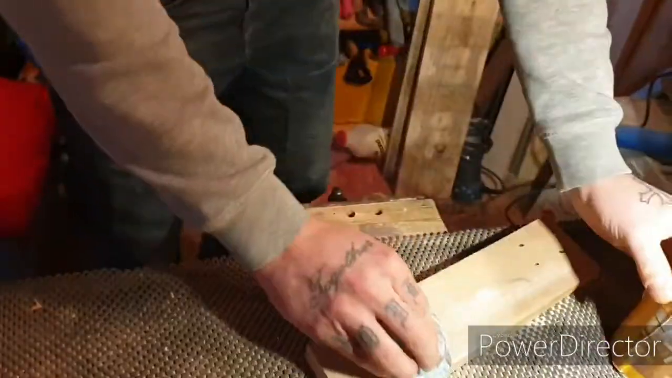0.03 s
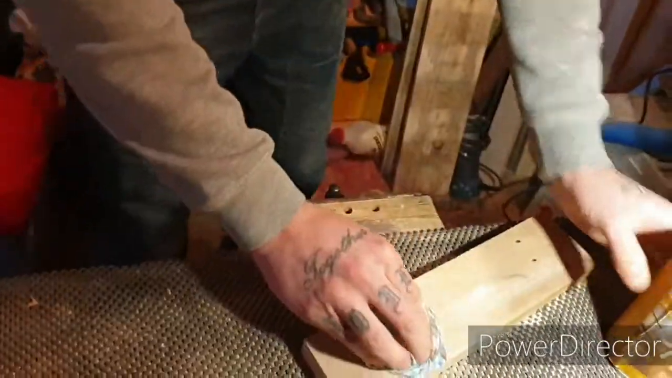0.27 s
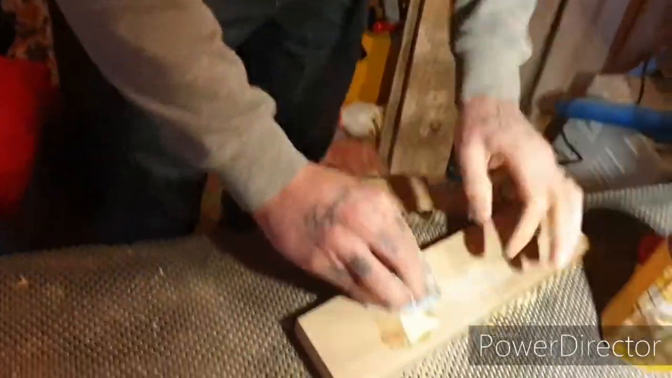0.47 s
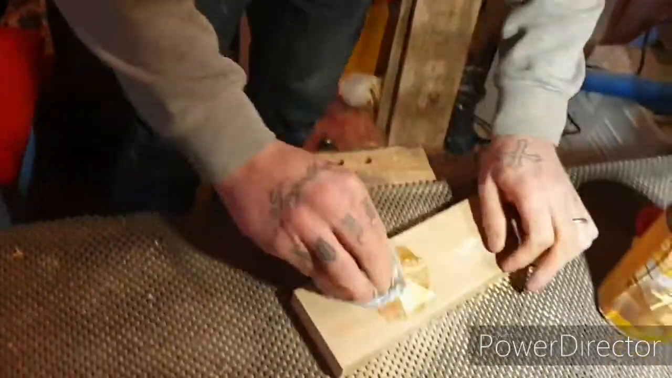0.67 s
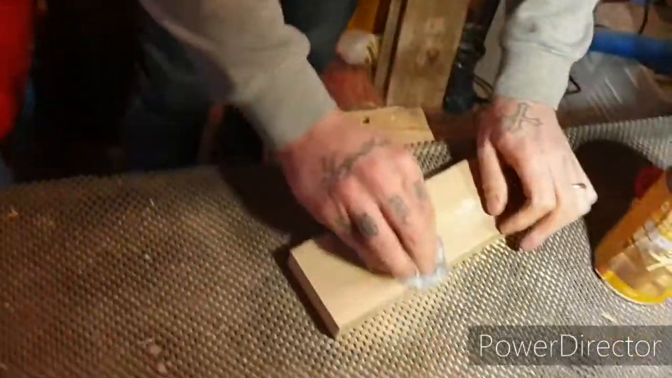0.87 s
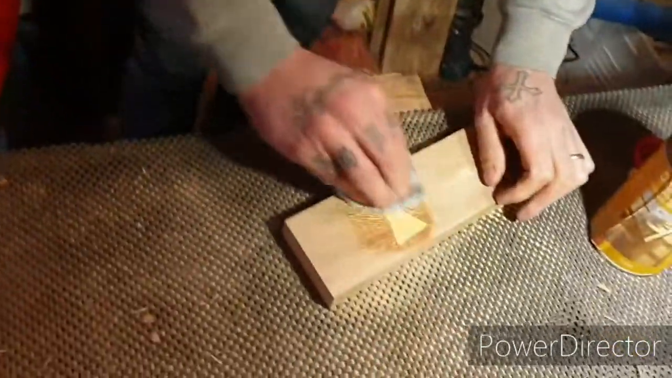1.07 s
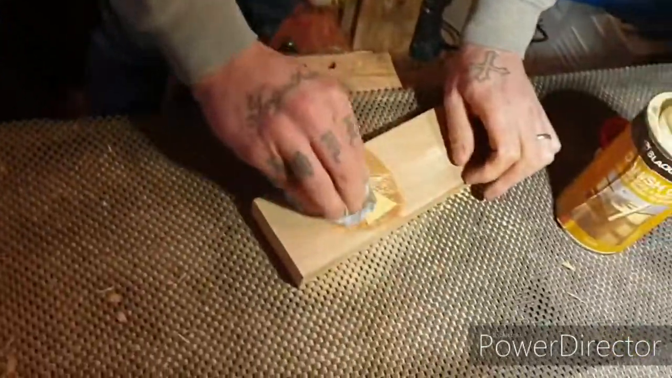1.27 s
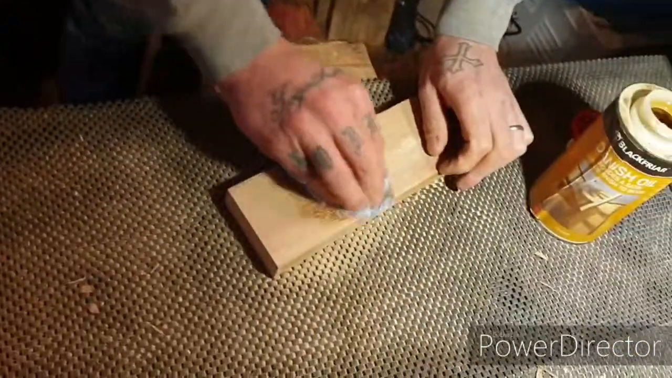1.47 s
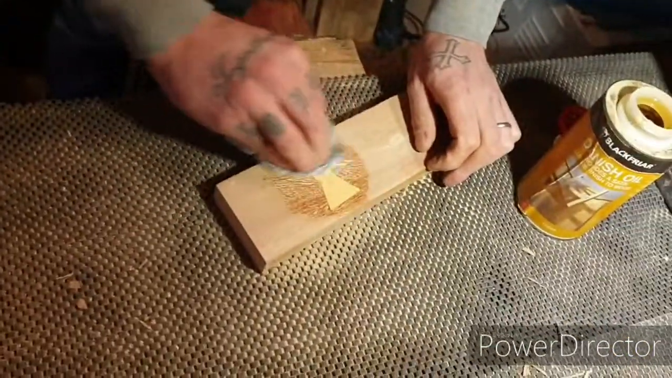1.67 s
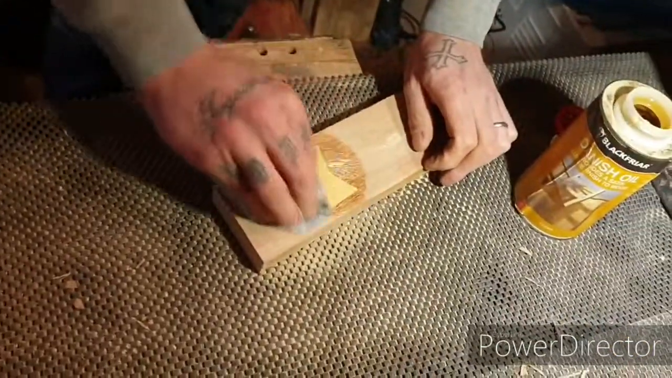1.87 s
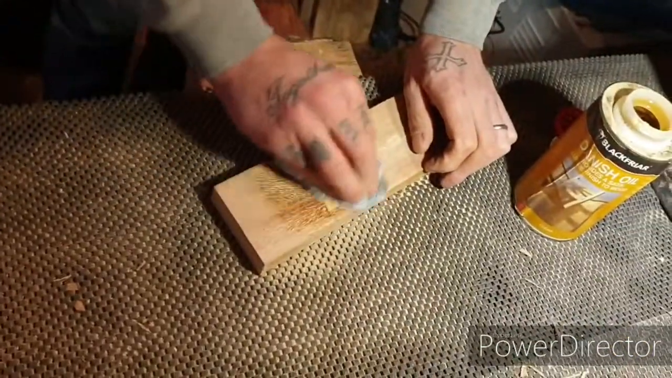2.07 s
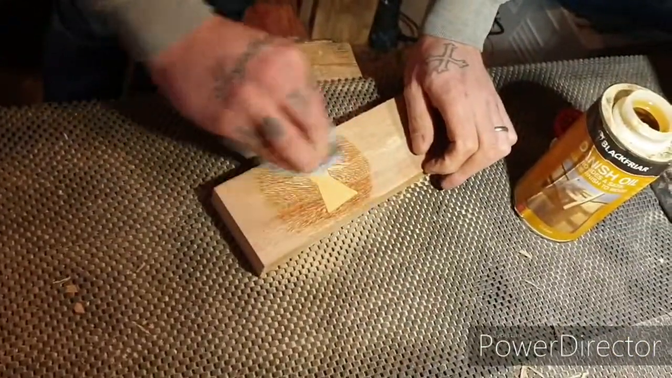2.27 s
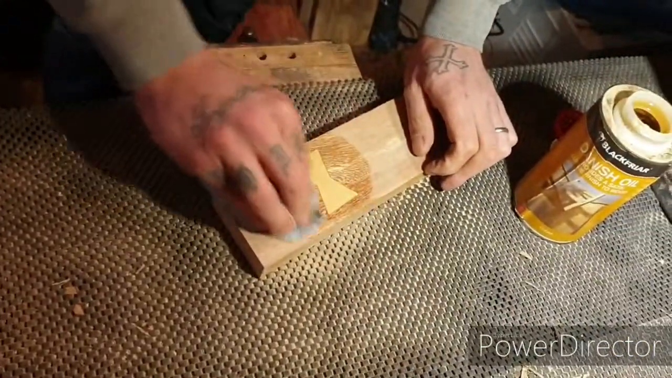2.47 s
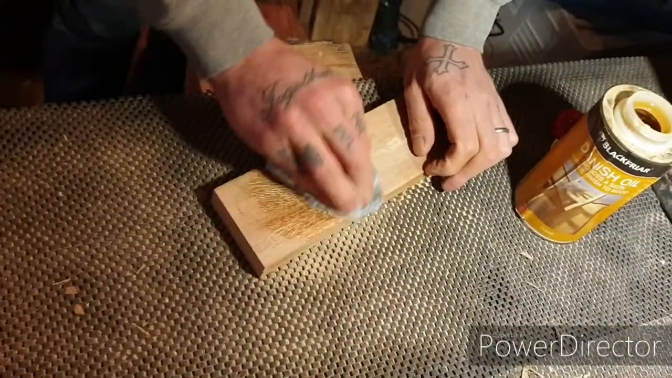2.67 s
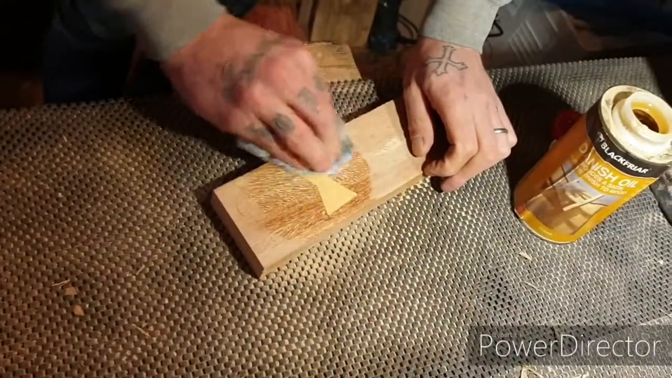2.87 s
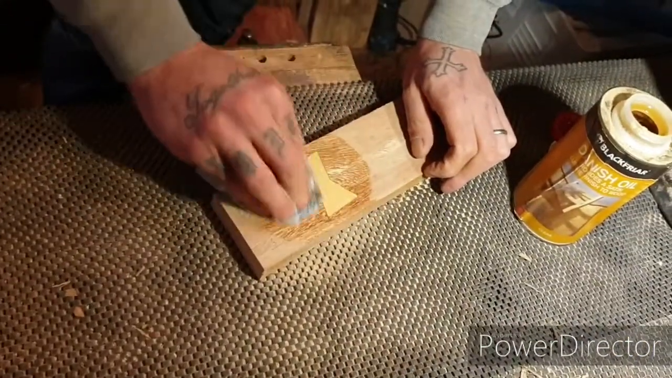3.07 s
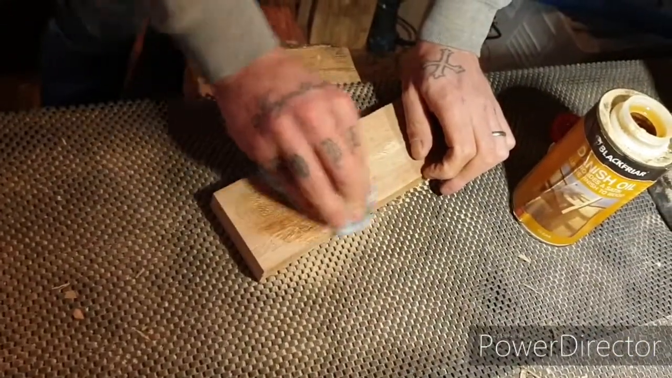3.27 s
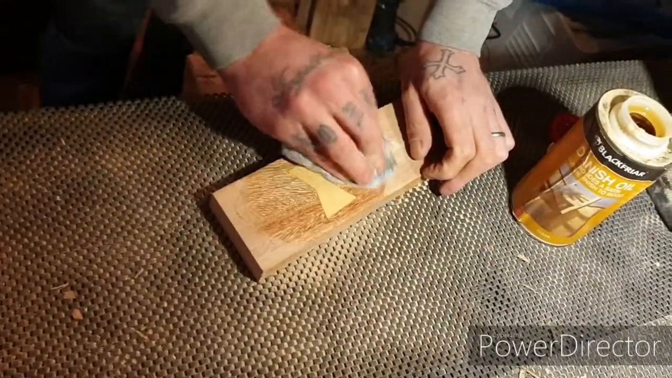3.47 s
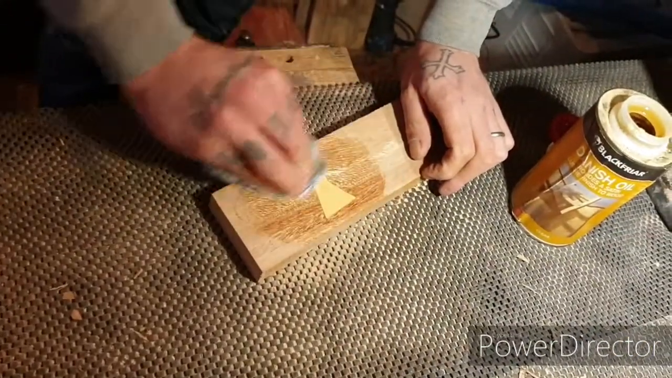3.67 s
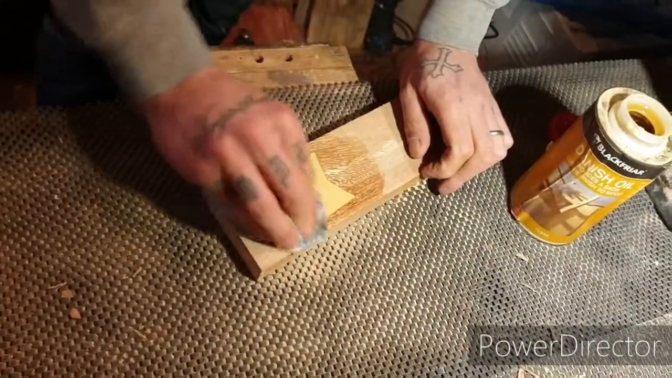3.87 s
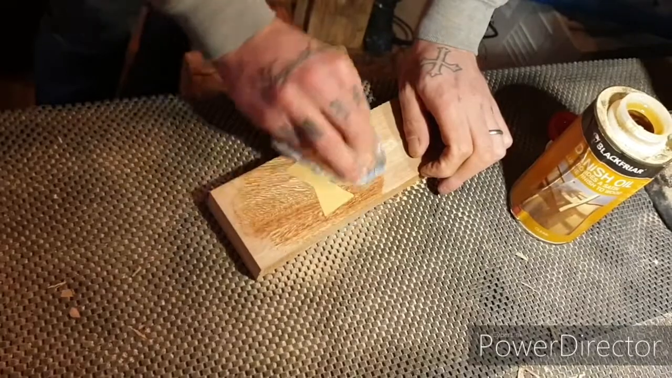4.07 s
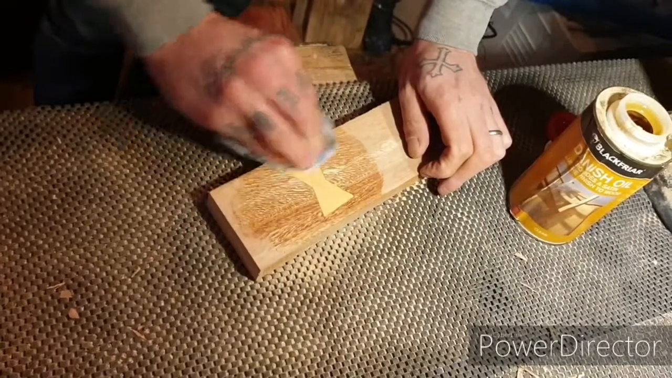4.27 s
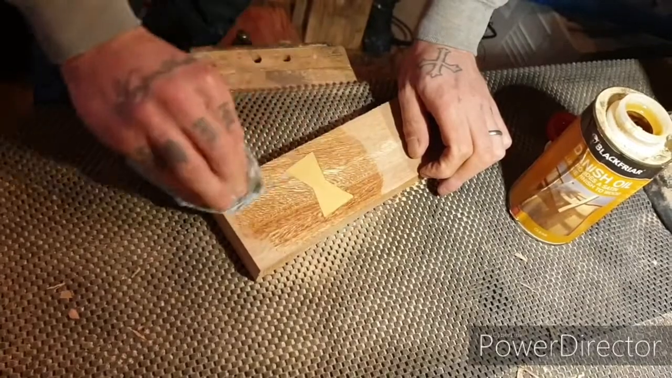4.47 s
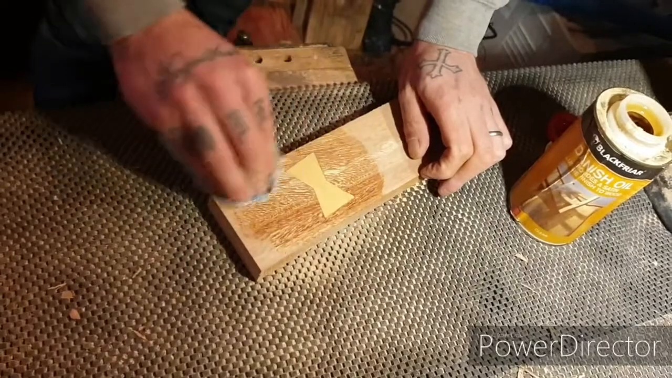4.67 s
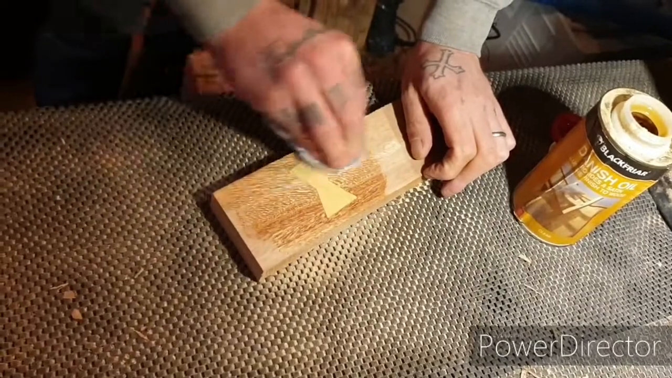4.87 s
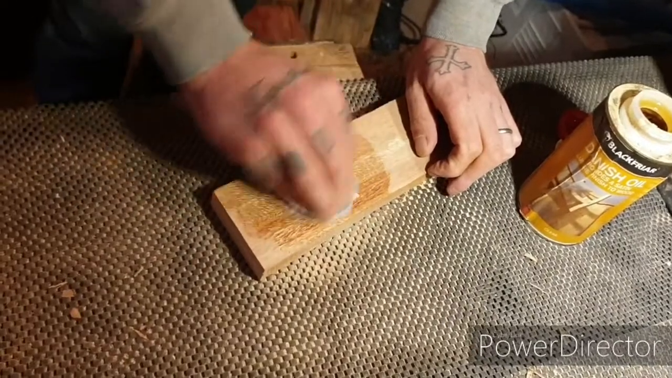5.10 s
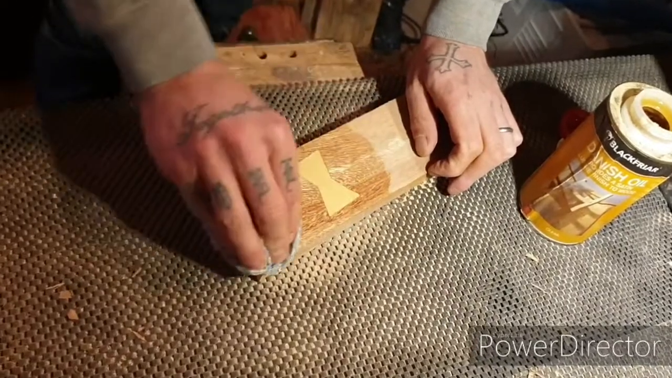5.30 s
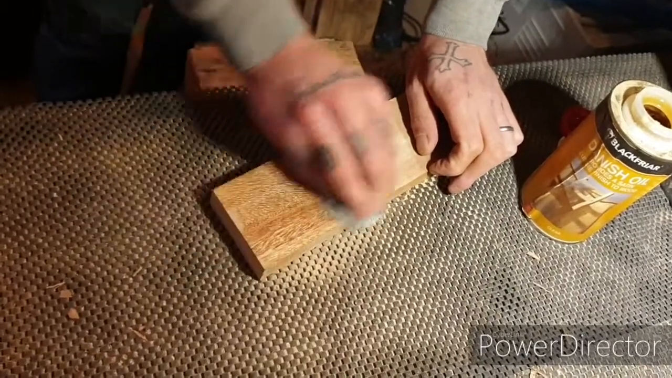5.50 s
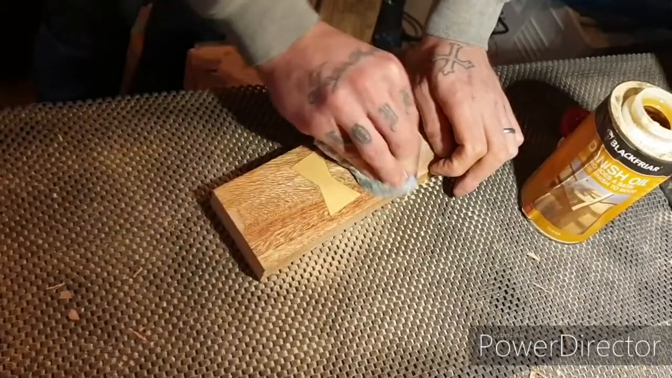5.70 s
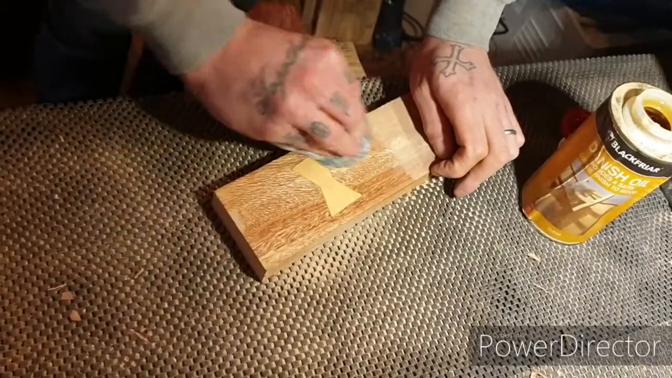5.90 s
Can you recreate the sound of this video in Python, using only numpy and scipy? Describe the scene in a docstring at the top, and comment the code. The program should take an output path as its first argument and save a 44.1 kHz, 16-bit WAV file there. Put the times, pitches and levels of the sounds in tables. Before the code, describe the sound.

A cloth scrubs over a small wooden board in breathy, back-and-forth strokes, with light wooden rattles and dull bench thumps in a quiet workshop.

```python
"""Cloth rubbed over a board

An oily cloth is rubbed in circles, then lifted and drawn in a few separate wipes, over a small wooden board on
a mat on a workbench; the microphone stands on the same bench. Cloth: coloured noise that follows the speed of
each stroke, over a duller drag on the grain. Board: short rattles drive its modes as it rocks; a fingertip or
ring taps, ticking as short decaying sines. Bench: pushes and soft blows ring its low modes."""
import sys
import numpy as np
from scipy import signal
from scipy.fft import rfft, irfft, next_fast_len
from scipy.io import wavfile

SR = 44100
rng = np.random.default_rng(int(sys.argv[2]) if len(sys.argv) > 2 else 0)


def transcribe(u):
    """Save the signal u as a 16-bit wav file named by the first command-line argument.

    u: samples, shape (n,) or (channels, n), limited to [-1, 1]; the rate is SR.
    q: integer samples, one column per channel.
    """
    v = np.clip(np.atleast_2d(u).T, -1, 1)
    q = np.round(v * 32767).astype(np.int16)
    wavfile.write(sys.argv[1], SR, q)


N = 261954

# passes of the cloth, each lasting to the next row: start t/s, fastest point/share of the pass,
# hiss at the slow turn level/dB, hiss in full swing level/dB, sheen gain/dB, fullness gain/dB
PASSES = [(0.0, 0.3, -72, -81.5, 5, 6), (0.045, 0.2, -81, -77, -2, 7.5), (0.16, .4, -80.5, -76, 0, -8),
          (0.31, 0.4, -84, -73.5, -7, -8), (0.421, 0.54, -80, -57, 3, -5.5),
          (0.64, 0.74, -62.5, -58, 3, -6), (0.884, 0.36, -62, -57.5, 6.5, -7),
          (1.16, 0.72, -61.5, -60, 6.5, -7.5), (1.47, 0.62, -65.5, -57.5, 7.5, -10.5),
          (1.73, 0.66, -61.5, -58.5, 9.5, -4.5), (2.01, 0.77, -61, -56, 7, -3.5),
          (2.3, 0.63, -61, -57, 7.5, -9), (2.62, 0.55, -63.5, -57, 6.5, -5.5), (2.92, 0.8, -59, -59, 8, -3),
          (3.27, 0.66, -61, -57.5, 8, -5), (3.5, 0, -59.5, -58, 5, -3), (3.68, .5, -60, -58.5, 9, -7),
          (3.97, 0.56, -66.5, -55.5, 8, -6), (4.26, 0.58, -60, -59, 10, -4), (4.619, .5, -87, -90, 13, 1),
          (4.748, 0.36, -74.5, -55, 5, -3), (5.065, 0.64, -66.5, -51.5, 8.5, -10),
          (5.365, 0.1, -85, -75.5, 8, -1), (5.422, 0.39, -77, -52, 8, -5), (5.753, 0.36, -80, -56, 4, -3)]
# spectrum of the cloth hiss: f/Hz, relative density level/dB
HISS_SPECTRUM = [(710, -29), (1200, -8.5), (1280, -13), (1550, -3), (1790, -6.5), (3750, 2), (4760, -0.5),
                 (6710, 0), (8140, -6.5), (9890, 0.5), (11100, -2), (13400, 1.5), (14900, -5), (15700, -5)]
# drag of the cloth on the wood: t/s, level/dB before the dips at the turns
DRAG_LEVEL = [(0.1, -72), (0.5, -72), (0.92, -66.5), (1.7, -69), (2.05, -64), (2.7, -67.5), (3.1, -60.5),
              (3.85, -69), (4.6, -73), (4.96, -56.5), (5.3, -66), (5.94, -68.5)]
# spectrum of the drag: f/Hz, relative density level/dB
DRAG_SPECTRUM = [(300, -2), (500, -1.5), (800, -5.5), (1200, -12.5), (1500, -11.5), (2200, -12),
                 (3500, -29.5)]
# board rocking onto the mat: t/s, rattle drive level/dB, low-mode drive level/dB, rattle decay/s
KNOCKS = [(0.065, -61, -52.5, 0.022), (0.1, -61, -58, 0.013), (0.332, -57, -38, 0.045),
          (0.362, -44.5, -40, 0.028), (0.435, -57.5, -51, 0.037), (1.722, -48, -45.5, 0.03),
          (1.764, -49, -41.5, 0.02), (1.897, -52.5, -62, 0.018), (1.956, -44.5, -41, 0.017),
          (2.009, -49.5, -44, 0.021), (2.076, -44, -38, 0.036), (2.106, -44, -48, 0.014),
          (2.299, -56.5, -50, 0.061), (2.368, -48, -55, 0.0091), (2.74, -54.5, -53, 0.03),
          (3.088, -52.5, -52, 0.019), (3.114, -43, -41, 0.031), (3.12, -39, -35, 0.011),
          (3.282, -53.5, -67, 0.021), (3.777, -56, -50.5, 0.046), (4.071, -59, -46.5, 0.028),
          (4.165, -46, -40, 0.014), (4.201, -47, -48, 0.029), (4.274, -51.5, -42, 0.039),
          (4.301, -59, -53, 0.016), (4.613, -55, -52, 0.033), (4.774, -36.5, -37, 0.016),
          (4.871, -52.5, -52, 0.081), (5.103, -37, -41, 0.012), (5.197, -51, -47, 0.018),
          (5.286, -53, -49.5, 0.027), (5.517, -45, -44, 0.024), (5.725, -52, -70, 0.02),
          (5.771, -47, -45.5, 0.034)]
# modes of the board: f/Hz, relative level/dB, t60/s
BOARD_MODES = [(322, -5.5, 0.055), (498, -6.5, 0.023), (652, -7.5, 0.037), (814, -8, 0.034),
               (960, -2.5, 0.012), (1165, -2, 0.016), (1344, 2, 0.0074), (1580, -4, 0.013),
               (1521, -9, 0.012), (1860, 1.5, 0.0094), (2222, -6.5, 0.032), (2500, -4.5, 0.014),
               (2830, -6.5, 0.017), (3400, -2, 0.0068), (4180, -3, 0.0082)]
# dry single taps of a fingertip or ring on wood: t/s, drive level/dB, centre f/Hz
TICKS = [(0.6649, -41, 550), (.889, -44, 450), (1.2593, -37, 470), (3.1192, -33.5, 900),
         (3.1207, -21.5, 2200), (4.1665, -35.5, 770), (4.2030, -35.5, 595), (4.7744, -26, 1550),
         (4.783, -46, 1210), (5.102, -31, 1900), (5.774, -36, 810)]
# hands working the bench: t/s, deep sway level/dB, top bounce level/dB, upper rumble level/dB
SHAKE_LEVELS = [(0.0, -67, -60, -65), (0.94, -49.5, -63, -62), (1.31, -56, -56, -55),
                (1.74, -55, -59, -55.5), (2.05, -61, -60, -60.5), (2.4, -50.5, -58.5, -58),
                (3.11, -72, -54, -57), (3.77, -76, -59, -60), (4.37, -61, -56.5, -62),
                (4.63, -67, -59.5, -61.5), (5.24, -53, -57, -61.5), (5.94, -53, -55.5, -63)]
# soft blows on the bench: t/s, drive level/dB, contact time scale/s
THUMPS = [(.028, -36, 0.001), (0.044, -45, 0.0017), (0.121, -49, .0009), (0.3273, -38.5, 0.00032),
          (0.3364, -20.5, 0.00067), (0.353, -30, 0.00058), (0.406, -53, 0.00051), (0.664, -43, 0.00064),
          (0.888, -50, 0.00029), (1.258, -43, 0.00042), (2.083, -46, .0005), (3.119, -45, .0006),
          (4.286, -56, 0.00044), (4.605, -48.5, .0007), (4.78, -43.5, 0.00037), (5.103, -40.5, 0.00082)]
# modes of the bench top: f/Hz, relative level/dB, t60 after a blow/s
BENCH_MODES = [(50.5, -5.5, 0.16), (59.6, -10.5, 0.3), (86, -8.5, 0.61), (98, -2, 0.31), (113, -11.5, 0.17),
               (153, -10, 0.13), (180, -4.5, 0.11), (215, -10.5, 0.16), (237, -16, 0.049),
               (334.6, -10, 0.13), (390.5, -15.5, 0.11)]
# spectrum of the quiet workshop: f/Hz, relative density level/dB
WORKSHOP_SPECTRUM = [(12, -35), (20, -17), (55, 5), (81, -13.5), (220, -7.5), (260, -18.5), (316, -28.5),
                     (418, -29.5), (481, -24.5), (672, -32.5), (15700, -70)]
# likeness of left and right in the coloured noises: f/Hz, likeness/1
LIKENESS = [(40, 0.98), (125, 0.97), (250, 1), (500, 0.83), (1000, -0.032), (2000, 0.14), (4000, 0.15),
            (10000, 0.0069)]
# left over right in the coloured noises: f/Hz, gain/dB
LEFT_LEAD = [(60, 1), (110, 4), (200, 4.5), (380, 4), (700, 6.5), (1290, 1), (2380, 11.5), (4400, 0),
             (8120, 7.5), (15000, 9.5)]

LAST_PASS_ENDS_S, LAST_TURN_DB = 6.05, -68
SWING_EXPONENT = 1   # under 1 the cloth grips quickly and holds its level
FULL_TO_HZ, SHEEN_FROM_HZ = 3500, 8000
SHEEN_LOST_AT_TURN_DB, FULLNESS_GAINED_AT_TURN_DB = 2, 1
DRAG_FOLLOWS, SHAKE_FOLLOWS = 0.1, 0.18   # shares of the hiss's dip in dB at each turn
FIRST_TOUCH_DB = -9   # pulse added to the rattle
WORKSHOP_DB = -56
MIC_NOISE_DB, MIC_HISS_FROM_HZ = -76, 10000   # level of the white noise before its lows are removed
BASS_CUT_HZ, CUTOFF_HZ = 36, 15700
OPPOSED = np.array([[1], [-1]])   # signs of left and right


def cloth():
    """Hiss of the weave, whose colour turns with the stroke, over the duller drag on the grain."""
    hiss_db, dip_db, sheen_db, full_db = stroke()
    hiss = coloured(fibres(spread_db=1.5, flutter_db=1.23, flutter_hz=3.3), HISS_SPECTRUM)
    hiss = folds(hiss, patchy_db=1.35, rate_hz=11.7)
    full = below(FULL_TO_HZ, hiss)
    full_and_middle = below(SHEEN_FROM_HZ, hiss)

    drag = coloured(fibres(spread_db=2.5, flutter_db=3.0, flutter_hz=8.8), DRAG_SPECTRUM)
    drag_db = in_time(DRAG_LEVEL)[0] + DRAG_FOLLOWS * np.minimum(dip_db, 0)
    out = from_db(drag_db) * drag
    parts = (
        (full, hiss_db + full_db),
        (full_and_middle - full, hiss_db),
        (hiss - full_and_middle, hiss_db + sheen_db),
    )
    for part, level_db in parts:
        wander_db = 0.3 * drift(3.5) * OPPOSED   # the hand moves between the ports
        out += from_db(level_db + wander_db) * part / np.std(part.mean(axis=0))
    return out


def stroke():
    """Each pass speeds up from its turn, swings and slows; the colour glides from pass to pass."""
    start_s, fastest, turn_db, swing_db, sheen_db, full_db = np.transpose(PASSES)
    turns_s, t = np.append(start_s, LAST_PASS_ENDS_S), np.arange(N) / SR
    middle_s = start_s + np.clip(fastest, .1, .9) * np.diff(turns_s)
    # whole numbers are turns, halves the fastest points
    place = np.interp(t, np.sort(np.append(turns_s, middle_s)), np.arange(2 * len(start_s) + 1) / 2)
    row = place.astype(int)
    speed = np.abs(np.sin(np.pi * place))

    nearest_turn = np.round(place).astype(int)
    slow = from_db(np.append(turn_db, LAST_TURN_DB))[nearest_turn]
    swing = from_db(swing_db)[row]
    hiss_db = 20 * np.log10(slow + speed ** SWING_EXPONENT * (swing - slow))
    dip_db = hiss_db - swing_db[row]
    sheen = np.interp(t, middle_s, sheen_db) - SHEEN_LOST_AT_TURN_DB * (1 - speed ** 2)
    fullness = np.interp(t, middle_s, full_db) + FULLNESS_GAINED_AT_TURN_DB * (1 - speed)
    return hiss_db, dip_db, sheen, fullness


def fibres(spread_db, flutter_db, flutter_hz):
    """Countless fibres slip with uneven strength, and the grip of the cloth flutters."""
    strength_db = spread_db * np.minimum(rng.exponential(1, N), 5)
    slips = rng.standard_normal((2, N)) * from_db(strength_db)
    return slips * from_db(flutter_db * drift(flutter_hz))


def folds(hiss, patchy_db, rate_hz):
    """Folds of the cloth grip in patches: each narrow band swells and fades on its own."""
    size = next_fast_len(N)
    spectrum = rfft(hiss, size)
    hz = np.arange(1, size // 2 + 2) * SR / size
    place = 4 * np.log2(hz / 1000)   # quarter octaves
    out = np.zeros_like(hiss)
    for k in range(8):   # bands two octaves apart share one swell
        distance = np.abs((place - k + 4) % 8 - 4)
        share = np.clip(1 - distance, 0, 1)
        out += irfft(spectrum * share, size)[:, :N] * from_db(patchy_db * drift(rate_hz))
    return out


def board():
    """A knock is a first touch and a short uneven rattle; each drives the modes with its own strengths."""
    t = np.arange(int(.07 * SR)) / SR
    shape = (len(KNOCKS), 2, len(t))
    hits = rng.random(shape) < 1600 / SR   # 1600 per second on average
    touches = hits * rng.uniform(0.57, 1, shape) * rng.choice([-1, 1], shape)
    spot_db = rng.normal(0, 1.5, (len(KNOCKS), len(BOARD_MODES)))
    for rattle, (_, _, _, decay_s) in zip(touches, KNOCKS):
        rattle *= np.exp(-t / max(decay_s, .001))
        energy = np.sum(rattle ** 2, axis=1, keepdims=True) + 1e-9
        rattle *= np.sqrt(decay_s / .012 / energy)   # longer rattles carry more energy
        rattle[0, 0] += from_db(FIRST_TOUCH_DB)

    out = np.zeros((2, N))
    for k, (hz, mode_db, t60_s) in enumerate(BOARD_MODES):
        force = np.zeros((2, N + len(t)))
        for (s, db, low_db, _), rattle, own_db in zip(KNOCKS, touches, spot_db[:, k]):
            at = round(s * SR)
            drive_db = low_db if hz < 550 else db
            force[:, at:at + len(t)] += rattle * from_db(own_db + drive_db)
        near, far = from_db(mode_db) * ring(force[:, :N], hz, t60_s) * (-1) ** k
        apart = np.clip(hz / 1100, 0, 1.2)   # the far end reaches the two ports unlike in the highs
        out += near + apart * far * OPPOSED
    soften = signal.butter(2, 4500, fs=SR, output="sos")
    return signal.sosfilt(soften, out) * from_db(1.5 * OPPOSED)


def ticks():
    """Each tick is a pulse that dies within about two cycles."""
    out, t = np.zeros(N), np.arange(int(.02 * SR)) / SR
    for s, db, hz in TICKS:
        at = round(s * SR)
        envelope = np.exp(-1.6 * hz * t) * np.minimum(3 * hz * t, 1)
        out[at:at + len(t)] += from_db(db) * np.sin(2 * np.pi * hz * t) * envelope
    return out * from_db(1.5 * OPPOSED)


def bench():
    """Uneven pushes and soft blows ring the same low modes."""
    blows, t = np.zeros(N), np.arange(int(.04 * SR)) / SR
    for s, db, contact_s in THUMPS:
        contact = t ** 3 * np.exp(-2 * t / max(contact_s, 1e-4))   # a padded contact: smooth push
        at = round(s * SR)
        blows[at:at + len(t)] -= from_db(db) * contact / contact.sum()

    groups, struck = np.zeros((3, 2, N)), 0
    for hz, db, t60_s in BENCH_MODES:
        push = rng.standard_normal((2, N)) * from_db(2.9 * drift(27))
        pair = push[0] + hz / 700 * push[1] * OPPOSED   # higher modes reach the ports less alike
        group = np.searchsorted([72, 135], hz)   # sway, bounce, rumble
        groups[group] += from_db(db) * ring(pair, hz, 0.67 * t60_s)
        struck = struck + from_db(db) * ring(blows, hz, t60_s) * (1 + hz / 1500 * OPPOSED)
    shake = sum(from_db(db) * rms_one(group) for db, group in zip(in_time(SHAKE_LEVELS), groups))
    dip_db = np.minimum(stroke()[1], 0)
    shake = shake * from_db(SHAKE_FOLLOWS * dip_db)   # the bench calms with the cloth
    return (shake + struck) * from_db(.7 * OPPOSED)


def workshop():
    """Steady noise with the spectrum of the quiet workshop."""
    return from_db(WORKSHOP_DB) * coloured(rng.standard_normal((2, N)), WORKSHOP_SPECTRUM)


def microphone_hiss():
    """Faint steady hiss of the microphone: the top of white noise, separate at each port."""
    white = rng.standard_normal((2, N))
    return from_db(MIC_NOISE_DB) * (white - below(MIC_HISS_FROM_HZ, white))


def coloured(source, spectrum):
    """Two unrelated rows become a left-right pair with the given spectrum; their mean has rms 1."""
    size = next_fast_len(N)
    hz = np.maximum(np.arange(size // 2 + 1) * SR / size, 1)
    mid, side = rfft(source, size) * from_db(at_hz(spectrum, hz))
    alike = np.clip(at_hz(LIKENESS, hz), -.99, .99)
    pair = np.sqrt(1 + alike) * mid + np.sqrt(1 - alike) * side * OPPOSED
    lead_db = at_hz(LEFT_LEAD, hz) / 2 * OPPOSED
    pair = irfft(pair * from_db(lead_db), size)[:, :N]
    return pair / np.std(pair.mean(axis=0))


def ring(force, hz, t60_s):
    """A unit click sets a decaying sine of height about 1 ringing."""
    r, w = from_db(-60 / (t60_s * SR)), 2 * np.pi * hz / SR
    return signal.lfilter([0, np.sin(w)], [1, -2 * r * np.cos(w), r * r], force + 1e-18)


def drift(rate_hz):
    """Slow chance of spread 1: noise through two equal poles at rate_hz, made at SR / 40."""
    r = np.exp(-2 * np.pi * rate_hz * 40 / SR)
    noise = rng.standard_normal(N // 40 + 2002)
    slow = signal.lfilter([1], [1, -2 * r, r * r], noise)[2000:]   # drop the settling
    return np.interp(np.arange(N) / 40, np.arange(len(slow)), rms_one(slow))


def below(hz, x):
    """The part under hz, without delay."""
    return signal.sosfiltfilt(signal.butter(4, hz, fs=SR, output="sos"), x)


def in_time(rows):
    """Columns of a curve table at every sample."""
    s, *columns = np.transpose(rows)
    return [np.interp(np.arange(N) / SR, s, column) for column in columns]


def at_hz(points, hz):
    """Read a table over log frequency."""
    table_hz, values = np.transpose(points)
    return np.interp(np.log(hz), np.log(table_hz), values)


def from_db(db):
    """Gain of a level in dB."""
    return 10 ** (np.asarray(db) / 20)


def rms_one(x):
    """Scale to rms 1."""
    return x / np.sqrt(np.mean(x ** 2) + 1e-20)


def scene():
    """Cloth, board and bench over the quiet workshop and the hiss of the microphone."""
    return cloth() + board() + ticks() + bench() + workshop() + microphone_hiss()


def record(dry):
    """The microphone drops the deepest bass; the top is cut steeply."""
    bass_cut = signal.butter(3, BASS_CUT_HZ, "high", fs=SR, output="sos")
    top_cut = signal.ellip(12, .3, 70, CUTOFF_HZ, fs=SR, output="sos")
    return signal.sosfilt(top_cut, signal.sosfilt(bass_cut, dry))


dry = scene()
out = record(dry)
transcribe(out)
```